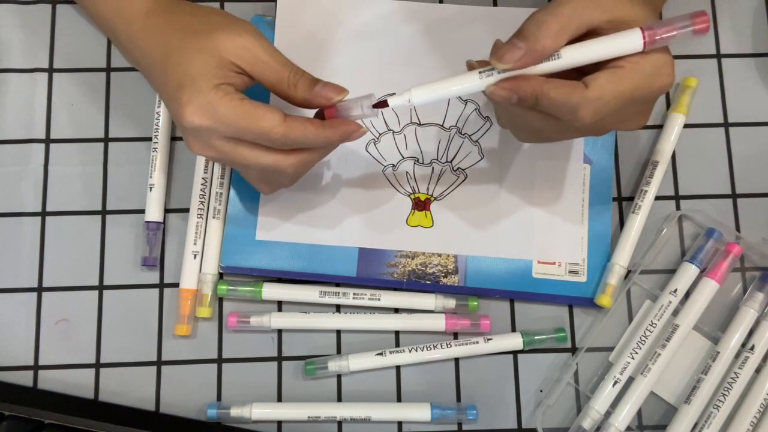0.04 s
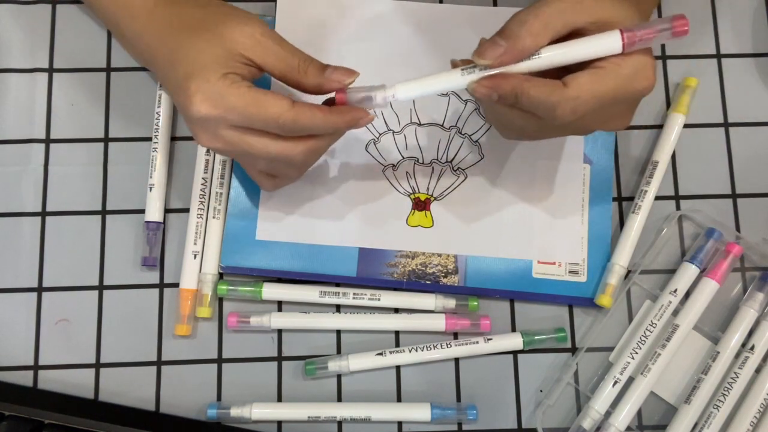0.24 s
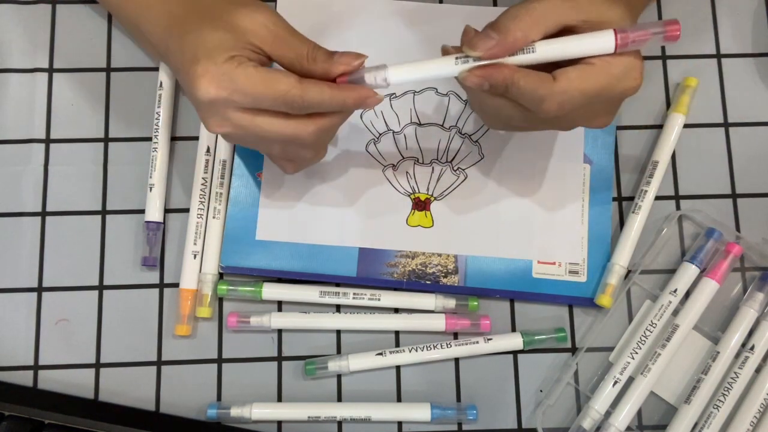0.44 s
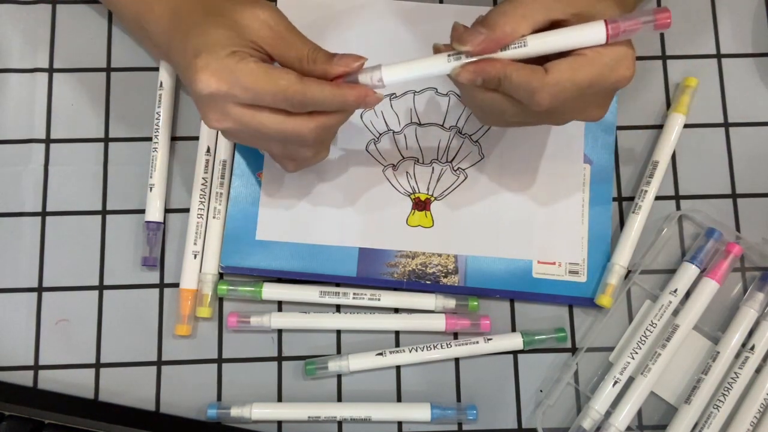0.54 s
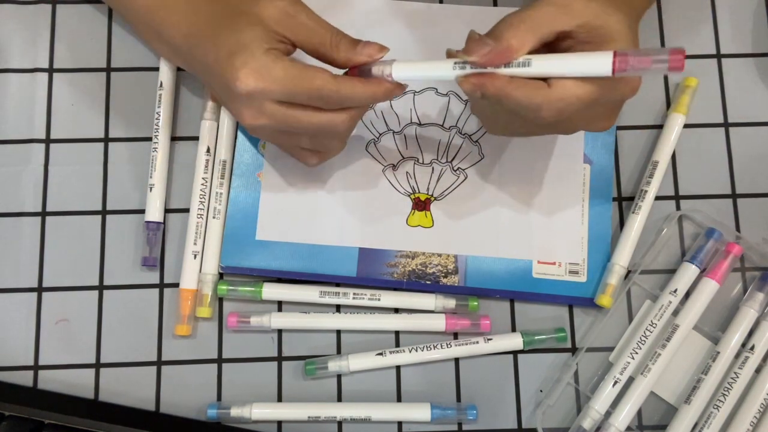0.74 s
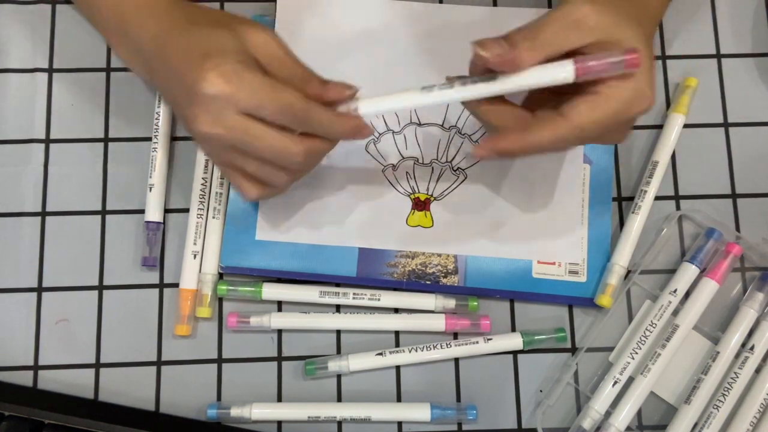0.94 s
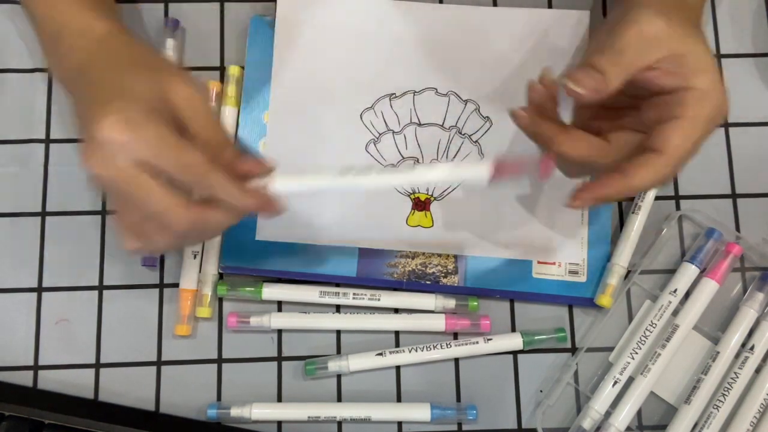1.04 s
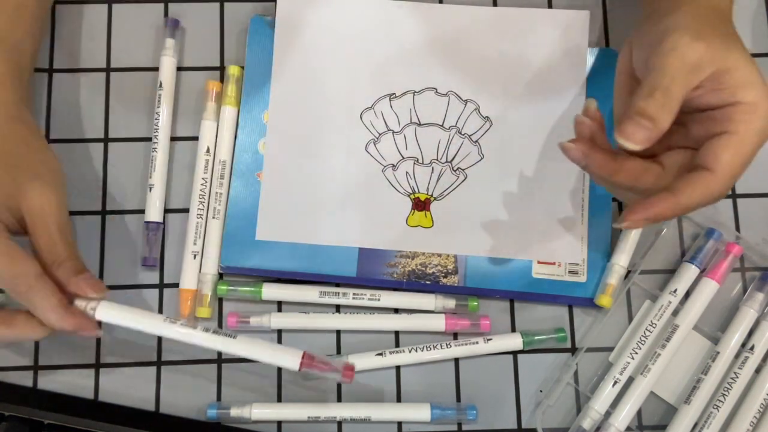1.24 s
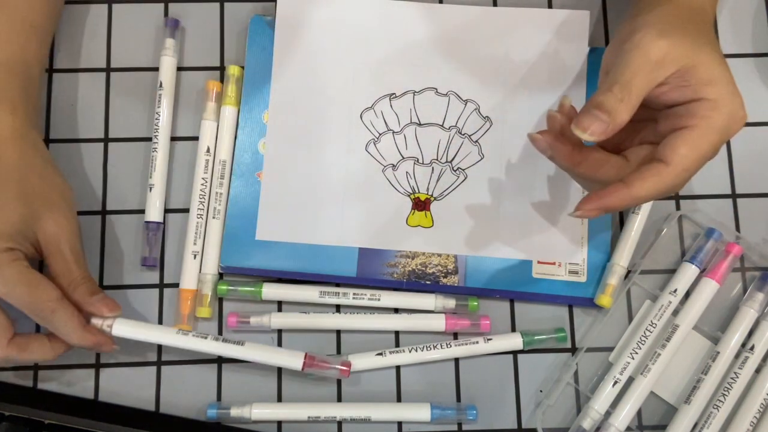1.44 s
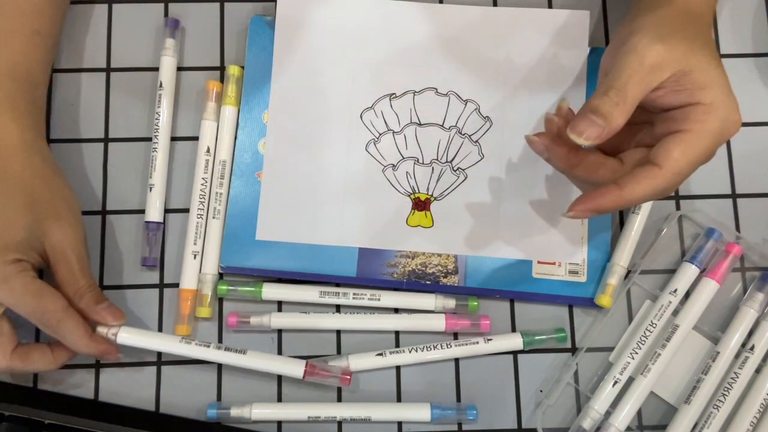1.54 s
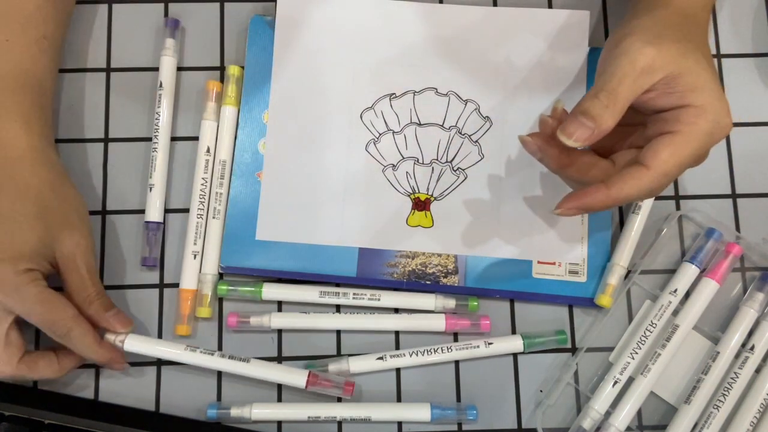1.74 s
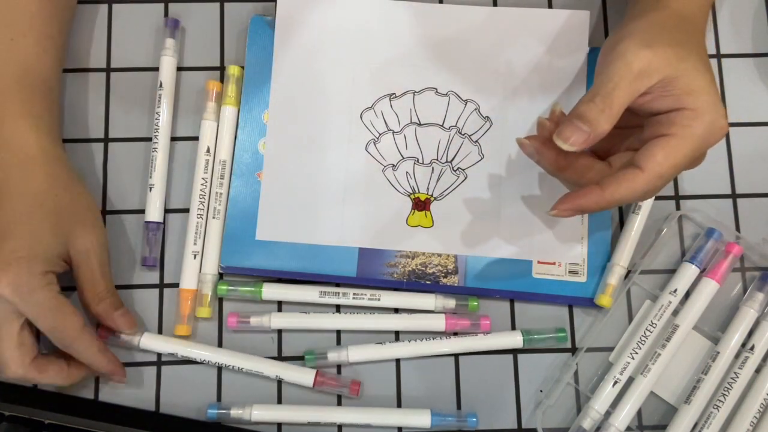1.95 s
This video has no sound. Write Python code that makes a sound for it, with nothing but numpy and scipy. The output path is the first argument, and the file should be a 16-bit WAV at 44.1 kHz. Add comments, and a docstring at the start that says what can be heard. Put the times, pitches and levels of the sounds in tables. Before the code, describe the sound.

A plastic marker cap snaps on with a sharp click, then the marker knocks onto a desk

```python
"""A quiet room with a desk, where low ventilation noise (shaped noise) and a hum (wavering sine) go on.
A felt marker is capped: the nib end scrapes into the cap (short noise bursts), which snaps home (ringing
modes and a dry crack). Fingers rub the barrel (swelling hiss), and skin squeaks briefly between rubs.
The marker is laid down: it ticks against its neighbours and knocks on the desk (ringing modes, dull thud).
The desk and a wall throw back early echoes, and a short room tail follows the scrapes, snap and touches."""
import sys
import numpy as np
from scipy import signal
from scipy.fft import rfft, irfft
from scipy.io import wavfile

SR = 44100
rng = np.random.default_rng(int(sys.argv[2]) if len(sys.argv) > 2 else 0)


def store_wav(level_fs):
    """Save 16-bit WAV to argv[1]."""
    pcm = np.round(np.clip(np.atleast_2d(level_fs), -1, 1) * 32767)
    wavfile.write(sys.argv[1], SR, pcm.T.astype(np.int16))


N = 88420
T = np.arange(N) / SR  # time of each sample [s]
FREQS = np.maximum(np.fft.rfftfreq(N, 1 / SR), 1)  # frequency of each spectrum bin [Hz]

# colour of the room's answer to the marker: (frequency [Hz], level [dB])
MARKER_TAIL_COLOUR = [(300, -24.5), (900, -8), (1500, -2.5), (2700, 1), (4200, -4.5), (6300, 1.5),
                      (7500, 7.5), (8500, -2), (12000, -2.5), (15500, -9), (16500, -23)]
MARKER_TAIL_DB = -16.5  # before the final levelling of each touch


def amp(db):
    """Turn decibels into a gain."""
    return 10 ** (np.asarray(db) / 20)


def unit(x):
    """Scale a sound so that its squared samples add up to one."""
    return x / np.sqrt(np.sum(x ** 2))


def at(points, hz):
    """Read a table between its points, along a logarithmic frequency axis."""
    table_hz, values = np.array(points, float).T
    return np.interp(np.log(hz), np.log(table_hz), values)


def noise(db):
    """Make noise with an rms of one, coloured by a relative level for each frequency."""
    spectrum = rfft(rng.standard_normal(N)) * amp(db)
    return unit(irfft(spectrum, N)) * np.sqrt(N)


def bell(distance):
    """Give the level [dB] of a smooth hump: 0 at its centre and 6 dB down at distance 1."""
    return -20 * np.log10(1 + distance ** 2)


def fade(t60):
    """Die away exponentially, losing 60 dB in t60 seconds."""
    return np.exp(-np.log(1000) * T / t60)


def walk(rate_hz):
    """Wander smoothly at random, mostly slower than rate_hz, with an rms of one."""
    return noise(bell(FREQS / rate_hz))


def late(x, seconds):
    """Delay a sound."""
    start = int(np.clip(seconds * SR, 0, N - 1))
    return np.concatenate([np.zeros(start), x[:N - start]])


def ring(modes):
    """Let an object ring after one blow: each mode is a tone that dies at its own rate."""
    tones = [amp(db) * fade(t60) * np.cos(2 * np.pi * hz * T) for hz, db, t60 in modes]
    return unit(sum(tones))


def burst(colour, t60):
    """Stand in for many close modes that die together: coloured noise with one fade."""
    return unit(noise(at(colour, FREQS)) * fade(t60))


def soften(x, cutoff_hz):
    """Weaken the upper modes, as a softer contact does."""
    low_pass = signal.butter(2, cutoff_hz, fs=SR, output="sos")
    return unit(signal.sosfilt(low_pass, x))


def radiate(x, limit_hz):
    """Thin out the bass: a body moves little air below its radiation limit."""
    high_pass = signal.butter(2, limit_hz, "high", fs=SR, output="sos")
    return unit(signal.sosfilt(high_pass, x))


def reverb(colour):
    """Make a diffuse room tail: noise in eight overlapping bands, each with its own fade."""
    # how long the room rings: (frequency [Hz], 60 dB decay time [s])
    room_t60 = [(200, 0.43), (1200, 0.37), (3000, 0.59), (7500, 0.5), (11000, 0.24), (16000, 0.4)]
    build_s = 0.0043  # time constant of the tail's onset
    centres = np.geomspace(200, 16000, 8)  # [Hz]
    spectrum = rfft(rng.standard_normal(N)) * amp(at(colour, FREQS))
    tail = 0
    # each row of the identity picks one band, blending into its neighbours
    for hz, peak in zip(centres, np.eye(len(centres))):
        share = np.interp(np.log(FREQS), np.log(centres), peak)
        tail = tail + irfft(spectrum * share, N) * fade(at(room_t60, hz))
    return unit(tail * (1 - np.exp(-T / build_s)))


def ventilation():
    """Low air noise stays steady, while a hum swells and its phase wavers."""
    # colour of the air noise: (frequency [Hz], relative level per Hz [dB])
    air_colour = [(24, -43.5), (40, -11), (74, -10), (93, -17.5), (119, -3), (191, -4), (306, -8),
                  (514, -13), (956, -19), (1080, -19.5), (1170, -22.5), (1290, -25), (7130, -34.5),
                  (15000, -46.5)]
    # swelling of the hum, before the trim below: (time [s], level [dB])
    hum_level = [(0.0, -66), (0.26, -64), (0.38, -67.5), (0.69, -56.5), (0.8, -78.5), (0.9, -61),
                 (1.31, -58.5), (1.44, -68.5), (2.0, -64.5)]
    air_db, hum_trim_db = -55, -1
    hum_hz, waver_rad, waver_rate_hz = 117, 0.2, 4
    phase = 2 * np.pi * hum_hz * T + waver_rad * walk(waver_rate_hz)
    hum = np.sqrt(2) * np.sin(phase)  # rms of one
    hum_db = hum_trim_db + np.interp(T, *np.array(hum_level).T)
    return amp(air_db) * noise(at(air_colour, FREQS)) + amp(hum_db) * hum


def squeak():
    """Skin squeaks briefly on the barrel between rubs: a narrow band of fading noise."""
    start_s, level_db, t60_s = 1.268, -31, 0.056
    centre_hz, half_width_hz = 1640, 150
    tone = noise(bell((FREQS - centre_hz) / half_width_hz)) * fade(t60_s)
    return amp(level_db) * late(unit(tone), start_s)


def rubs():
    """Skin rubs along the barrel and over the desk: hiss that swells, fades and is uneven."""
    # one row per rub, its level before the unevenness:
    # (middle [s], half length [s], level [dB], centre [Hz], half width [octaves])
    strokes = [(0.292, 0.032, -68, 3260, 0.78), (0.47, 0.058, -77, 3800, .7),
               (1.004, 0.15, -71.5, 8700, 2.2), (1.423, 0.088, -72.5, 3210, 0.14),
               (1.514, 0.14, -69, 1850, 0.58)]
    roughness, rough_rate_hz = 0.45, 119.5
    out = 0
    for middle, half, db, hz, octaves in strokes:
        hiss = noise(bell(np.log2(FREQS / hz) / octaves))
        swell = np.exp(roughness * walk(rough_rate_hz) - ((T - middle) / half) ** 2)
        out = out + amp(db) * hiss * swell
    return out


def desk():
    """The marker knocks on the desk, which rings with a dull thud and a room tail."""
    # marker meeting the desk: (time [s], level [dB], contact cut-off [Hz])
    knocks = [(1.4834, -17, 520), (1.8590, -11, 790), (1.8781, -2, 2640), (1.8850, -15, 720)]
    # modes of the desk with its sheet and pad: (frequency [Hz], level [dB], 60 dB decay time [s])
    desk_modes = [(132.8, -12, 0.035), (301, -4.5, 0.052), (442, -10, 0.036), (531, -10.5, 0.1),
                  (685, -9.5, 0.062), (1070, -8.5, .035), (1243, 0.5, 0.045), (1353, 1, 0.023),
                  (1780, -26, 0.02), (2380, -4.5, .02), (2630, -11.5, 0.017), (3880, -9, 0.018)]
    # colour of the thud: (frequency [Hz], level [dB])
    thud_colour = [(80, -10), (250, -0.5), (700, -0.5), (1300, -1.5), (2500, -6), (4500, -9.5), (8000, -15),
                   (15000, -8)]
    # colour of the room's answer to the desk: (frequency [Hz], level [dB])
    tail_colour = [(120, -9), (300, 6), (700, 0), (1150, 6), (1900, -4), (2800, -10), (4500, -16.5),
                   (12000, -19)]
    thud_t60_s, tail_db, radiation_hz = 0.048, -8.5, 89.5
    body = ring(desk_modes)
    tail = amp(tail_db) * reverb(tail_colour)
    out = 0
    for start, db, cutoff_hz in knocks:
        thud = burst(thud_colour, thud_t60_s)  # as strong as the ringing body
        blow = radiate(body + thud, radiation_hz)
        out = out + amp(db) * late(soften(blow + tail, cutoff_hz), start)
    return out


def click(body):
    """One blow on the marker: its modes with a dry crack and little bass."""
    # dense, quickly damped ringing of the plastic: (frequency [Hz], level [dB])
    crack_colour = [(300, -12.5), (900, -11), (1600, -15), (2600, 3.5), (4300, -1.5), (6500, 4), (9500, -2),
                    (12000, -2), (15000, -0.5), (16500, -6.5)]
    crack_db, crack_t60_s = -2.5, 0.017
    radiation_hz = 1118  # the small cap radiates little below this
    crack = amp(crack_db) * burst(crack_colour, crack_t60_s)
    return radiate(body + crack, radiation_hz)


def ticks():
    """Light, soft touches of plastic and fingernails make the marker's barrel ring."""
    # touches on the marker: (time [s], level [dB], contact cut-off [Hz])
    touches = [(0.5010, -34, 15000), (0.522, -33, 14000), (0.9297, -37.5, 13800), (1.0390, -42.5, 13930),
               (1.4250, -39, 14000), (1.4827, -28, 10900), (1.5470, -44, 14000), (1.8579, -17.5, 11700),
               (1.8608, -25, 7100)]
    # modes of the barrel when tapped: (frequency [Hz], level [dB], 60 dB decay time [s])
    barrel_modes = [(3147, -11, 0.033), (3490, -1, 0.02), (6370, -2, 0.011), (6820, -1.5, 0.013),
                    (7330, -3, 0.017), (9390, -3, 0.0075), (11380, -1, .009), (13080, -2.5, .008)]
    body = ring(barrel_modes)
    tail = amp(MARKER_TAIL_DB) * reverb(MARKER_TAIL_COLOUR)
    out = 0
    for start, db, cutoff_hz in touches:
        out = out + amp(db) * late(soften(click(body) + tail, cutoff_hz), start)
    return out


def scrapes():
    """The barrel sticks and slips as it slides into the cap: each catch is a burst of noise."""
    # barrel catching on the rim: (time [s], level of the burst [dB])
    catches = [(0.2259, -31.5), (0.2652, -30.5), (0.2767, -38), (0.2807, -24.5), (0.2882, -28.5),
               (0.2914, -41.5), (0.3056, -29.5), (0.324, -40), (0.4855, -37), (0.4999, -33), (0.5173, -20)]
    # colour of a catch and of its room tail: (frequency [Hz], level [dB])
    scrape_colour = [(500, -18.5), (1700, -5), (2600, -2.5), (3300, -0.5), (4200, 3.5), (5000, -8.5),
                     (7000, -11), (9000, -28.5), (15000, -22)]
    t60_s, tail_db = 0.018, -14
    tail = amp(tail_db) * reverb(scrape_colour)
    out = 0
    for start, db in catches:
        out = out + amp(db) * late(burst(scrape_colour, t60_s) + tail, start)
    return out


def snap():
    """The cap jumps its ridge and slams onto the seat: two ringing blows that fill the room."""
    # cap riding over its ridge, then hitting the seat: (time [s], level of the click [dB])
    blows = [(0.5247, 0), (0.52563, 5)]
    # modes of cap and barrel: (frequency [Hz], level [dB], 60 dB decay time [s])
    cap_modes = [(2917, -12.5, 0.016), (3130, -7, .012), (3830, -12, .017), (4757, -11.5, 0.023),
                 (5400, -21, 0.023), (5980, -5, 0.011), (6710, -1.5, 0.0067), (7005, -8.5, .018),
                 (7396, -8.5, 0.022), (7750, -7, .018), (8330, -16, .021), (11380, -16, .014),
                 (13870, -12.5, .012), (14000, -14, 0.016)]
    body = ring(cap_modes)
    out = 0
    for start, db in blows:
        tail = amp(MARKER_TAIL_DB) * reverb(MARKER_TAIL_COLOUR)
        out = out + amp(db) * late(click(body) + tail, start)
    return out


def early_echoes(near):
    """The desk and a wall throw back delayed, weaker copies of the nearby sounds."""
    # reflections: (delay [s], level [dB])
    reflections = [(.0031, -13.5), (.0073, -22.5), (0.0138, -17.5), (0.0181, -27)]
    return sum(amp(db) * late(near, delay) for delay, db in reflections)


def scene():
    """Add the marker, hand and desk, their early echoes and the background."""
    near = rubs() + squeak() + desk() + ticks() + scrapes() + snap()
    mix = ventilation() + near + early_echoes(near)
    return mix[None]  # one channel


def record(dry):
    """The recorder cuts the deep bass and the top of the treble."""
    low_cut_hz, top_hz = 43, 16200
    bass_cut = signal.butter(4, low_cut_hz, "high", fs=SR, output="sos")
    # steep top cut: 0.2 dB ripple below it, 80 dB down beyond it
    top_cut = signal.ellip(8, 0.2, 80, top_hz, fs=SR, output="sos")
    return signal.sosfilt(top_cut, signal.sosfilt(bass_cut, dry))


dry = scene()
out = record(dry)
store_wav(out)
```